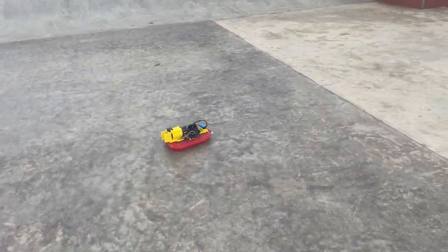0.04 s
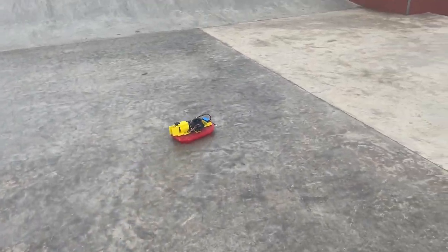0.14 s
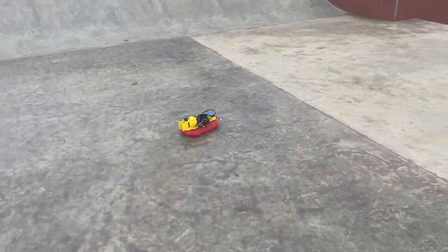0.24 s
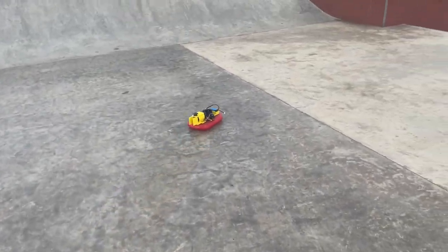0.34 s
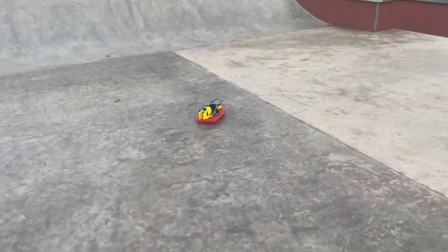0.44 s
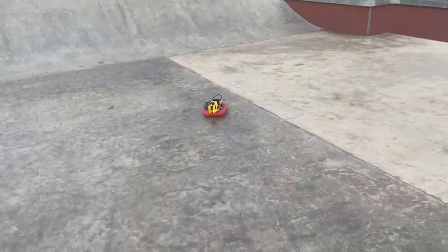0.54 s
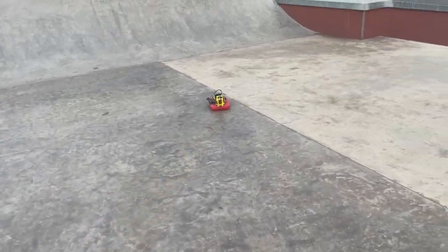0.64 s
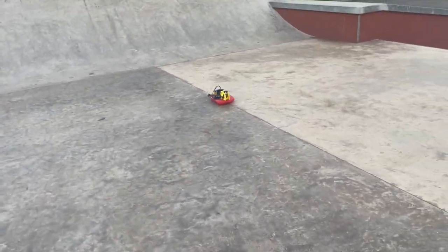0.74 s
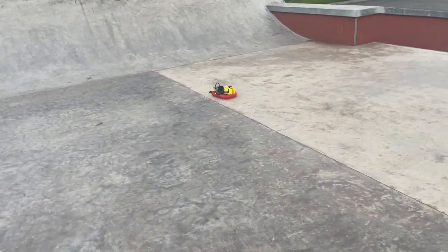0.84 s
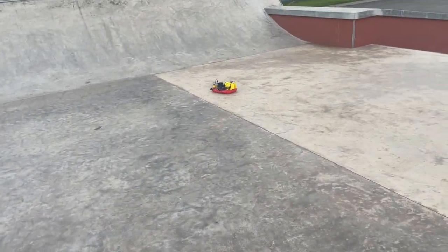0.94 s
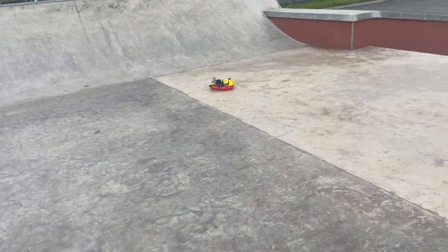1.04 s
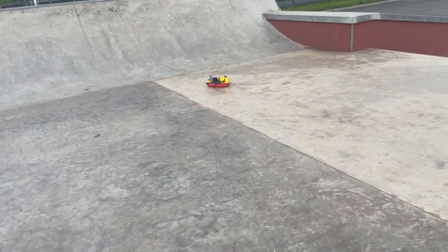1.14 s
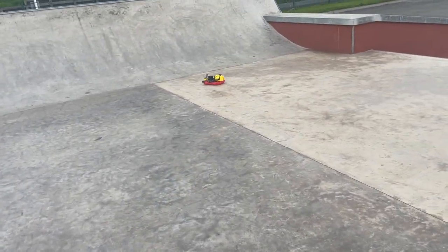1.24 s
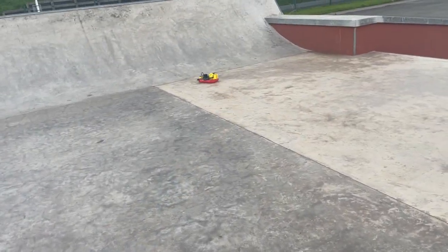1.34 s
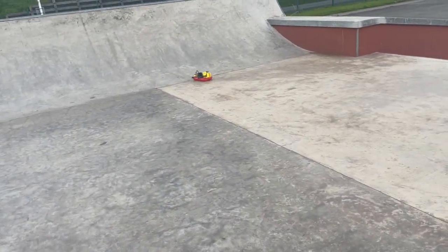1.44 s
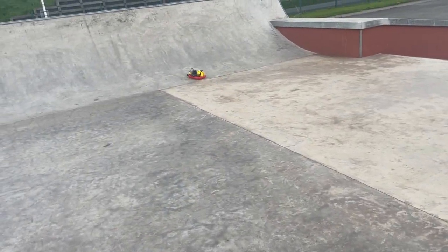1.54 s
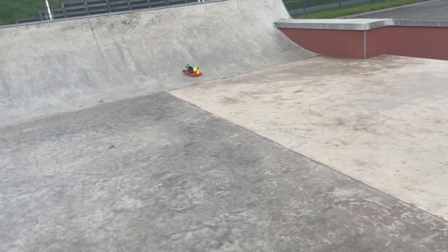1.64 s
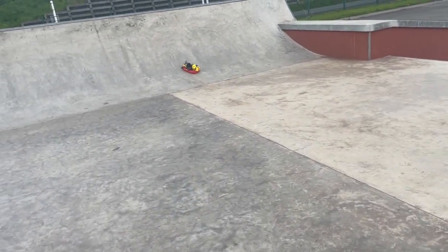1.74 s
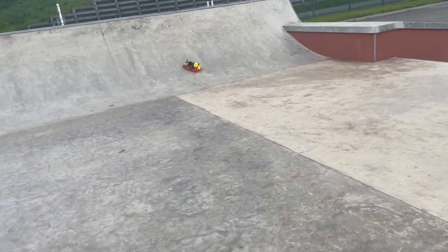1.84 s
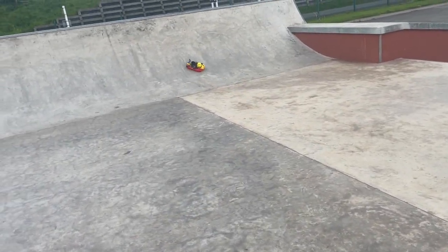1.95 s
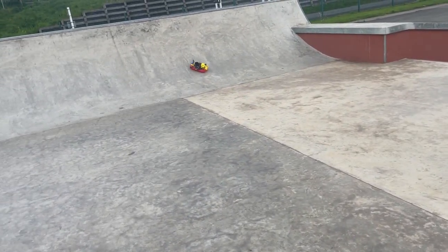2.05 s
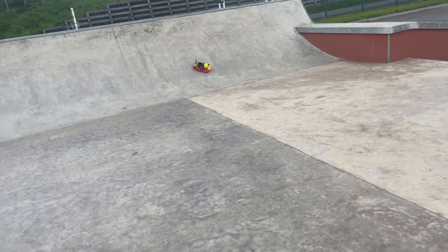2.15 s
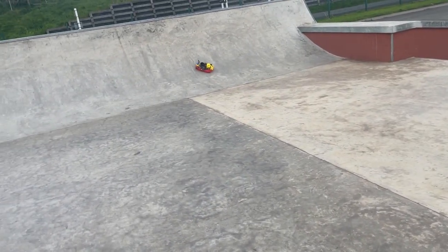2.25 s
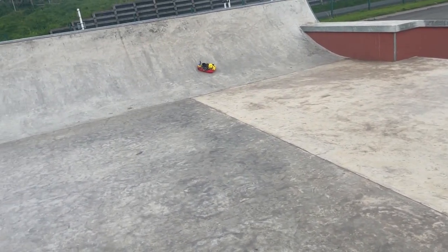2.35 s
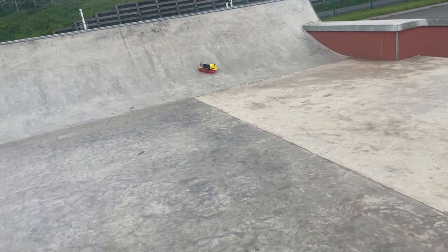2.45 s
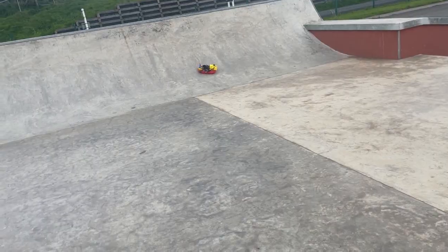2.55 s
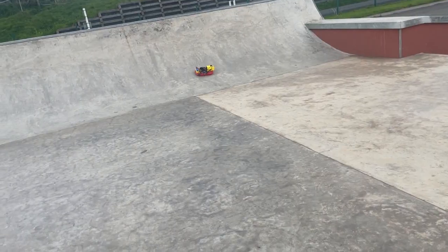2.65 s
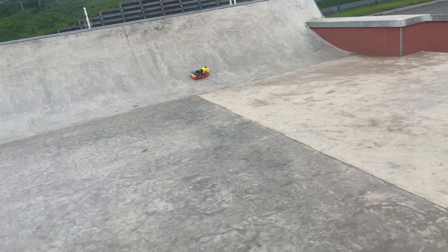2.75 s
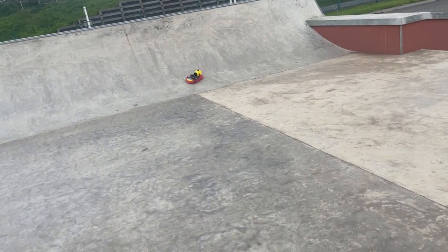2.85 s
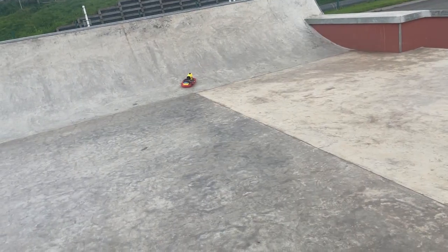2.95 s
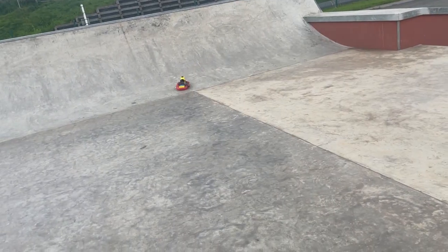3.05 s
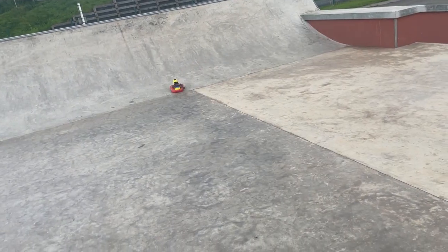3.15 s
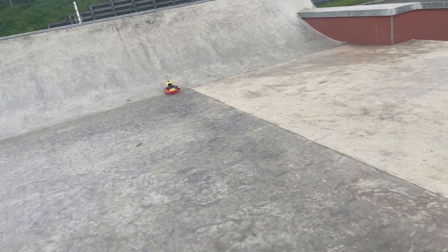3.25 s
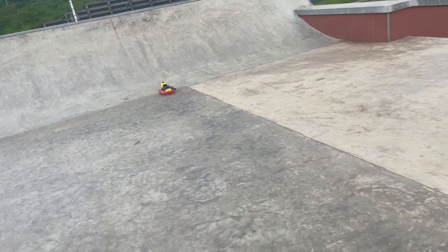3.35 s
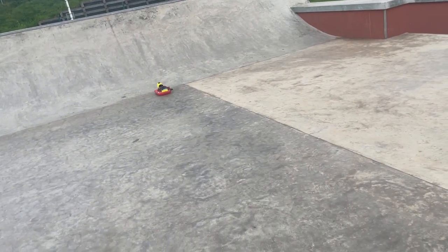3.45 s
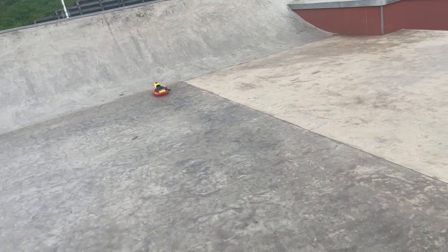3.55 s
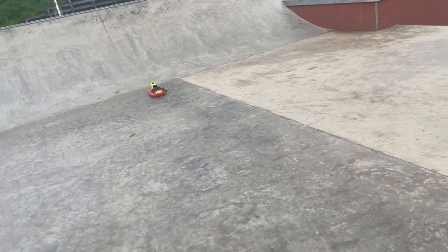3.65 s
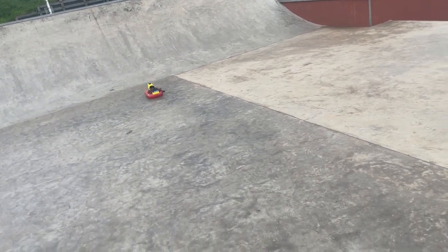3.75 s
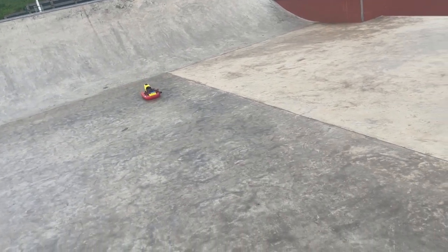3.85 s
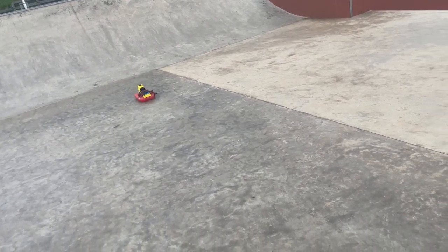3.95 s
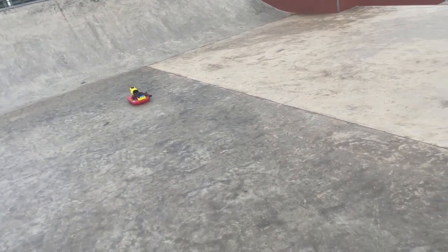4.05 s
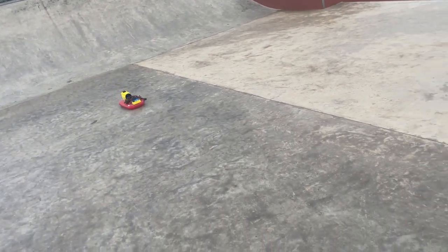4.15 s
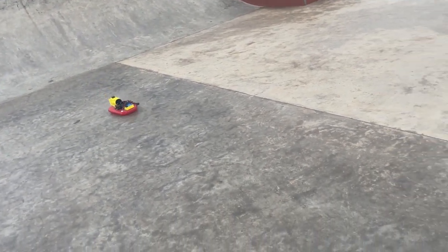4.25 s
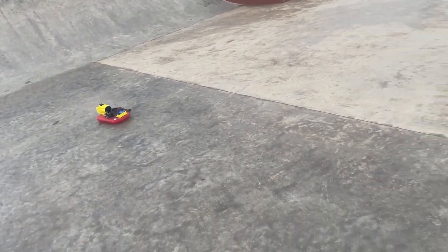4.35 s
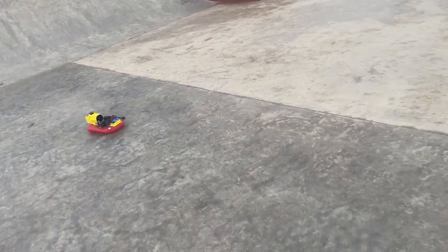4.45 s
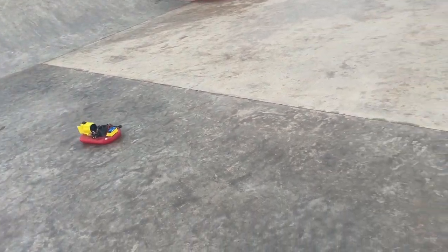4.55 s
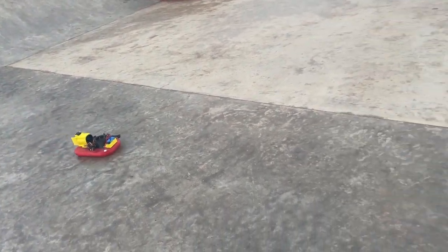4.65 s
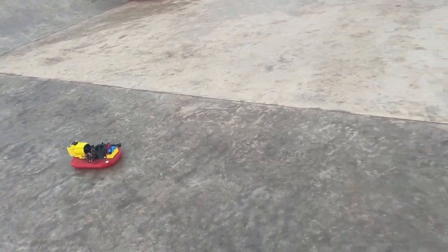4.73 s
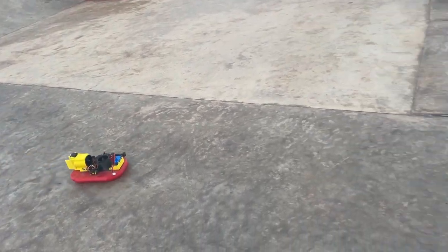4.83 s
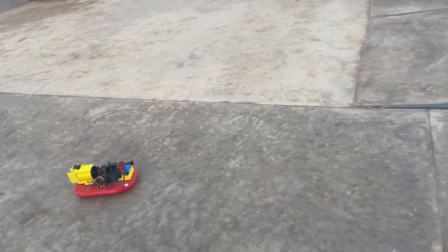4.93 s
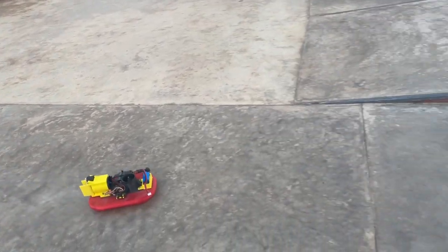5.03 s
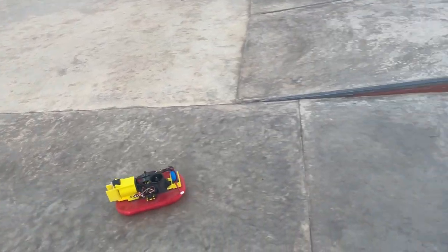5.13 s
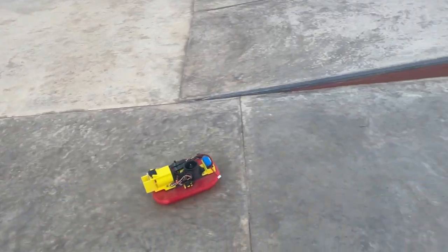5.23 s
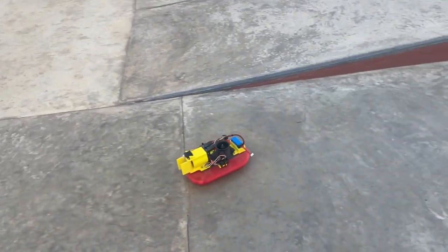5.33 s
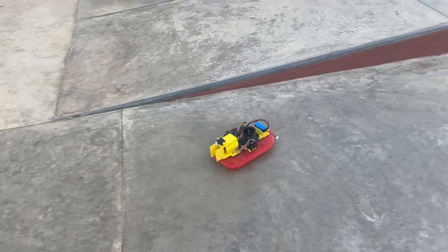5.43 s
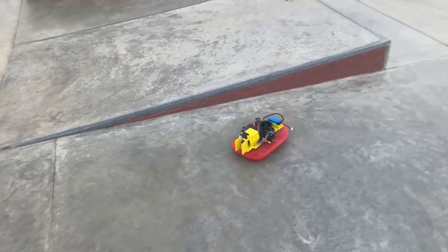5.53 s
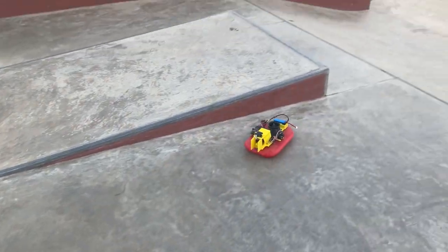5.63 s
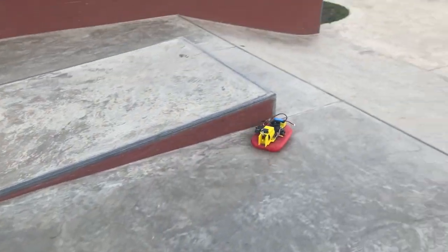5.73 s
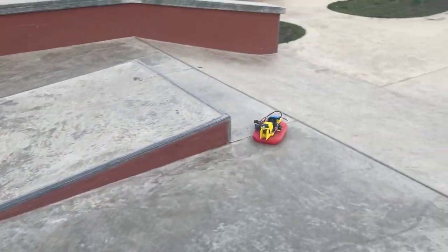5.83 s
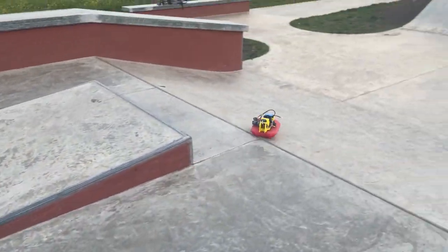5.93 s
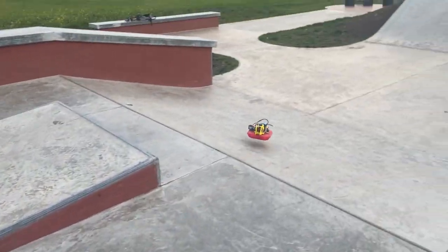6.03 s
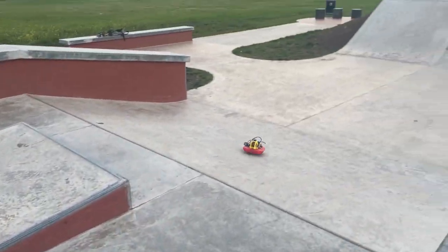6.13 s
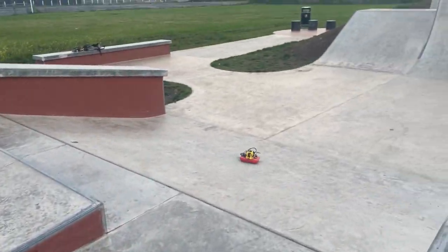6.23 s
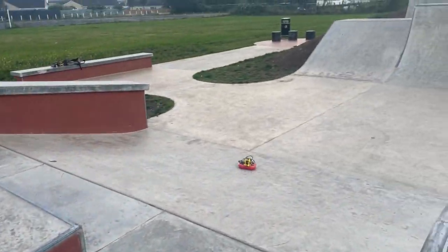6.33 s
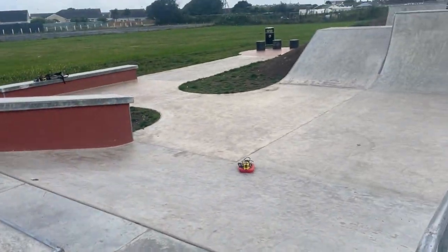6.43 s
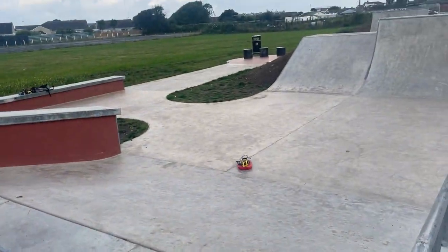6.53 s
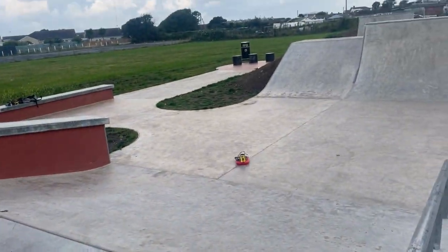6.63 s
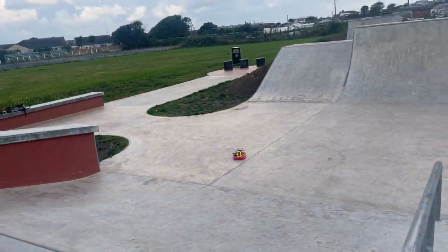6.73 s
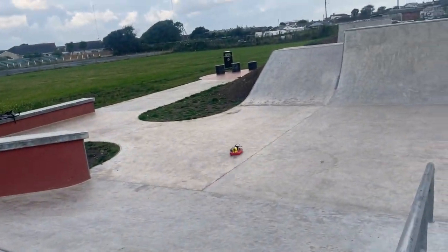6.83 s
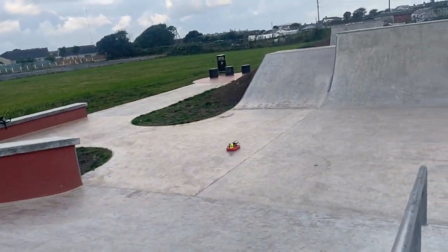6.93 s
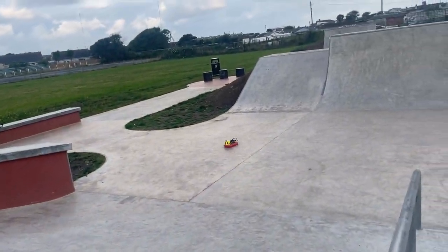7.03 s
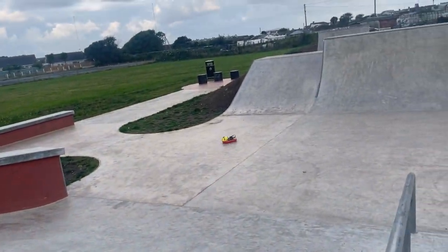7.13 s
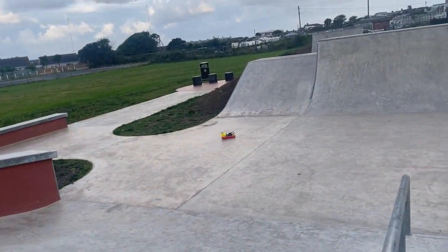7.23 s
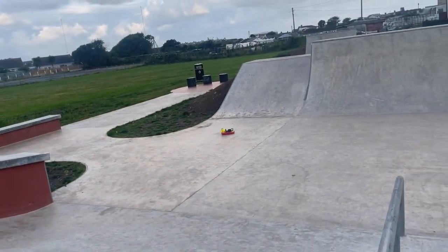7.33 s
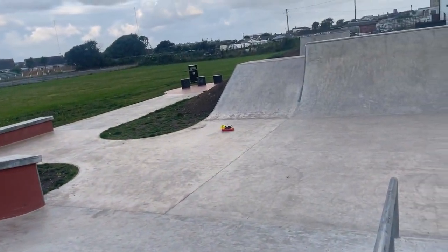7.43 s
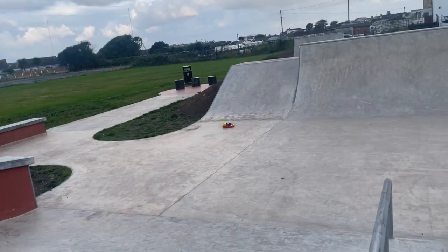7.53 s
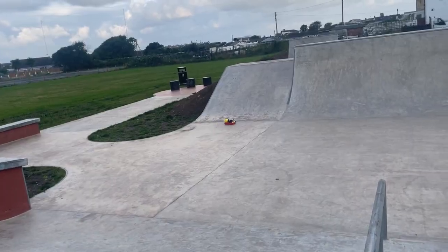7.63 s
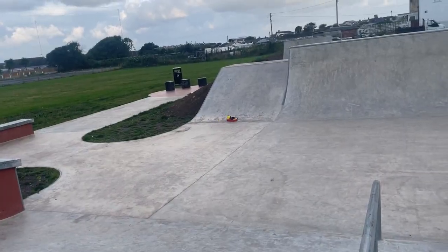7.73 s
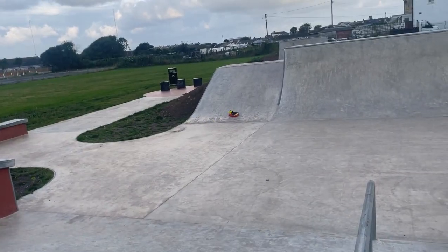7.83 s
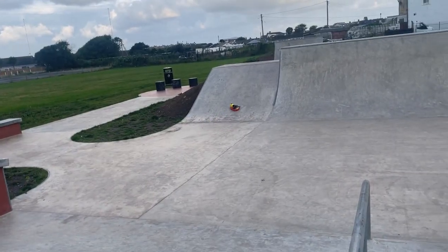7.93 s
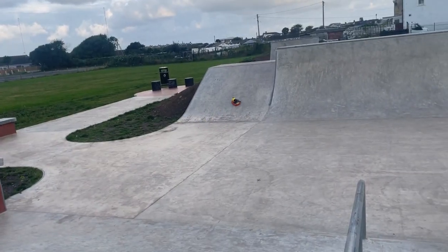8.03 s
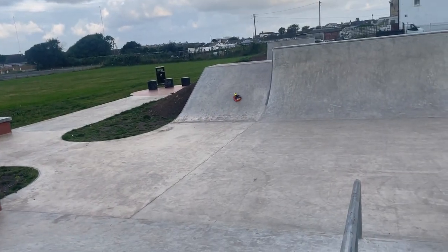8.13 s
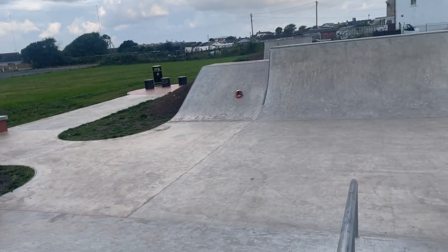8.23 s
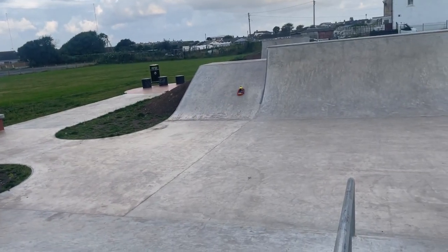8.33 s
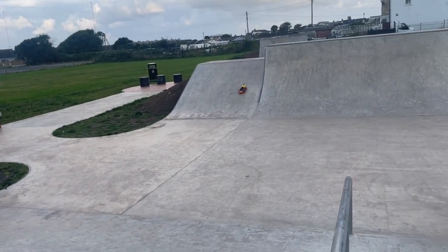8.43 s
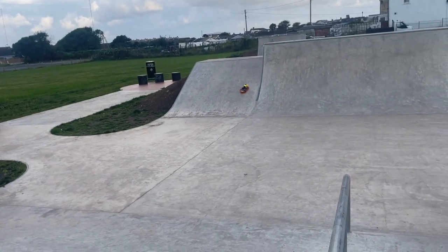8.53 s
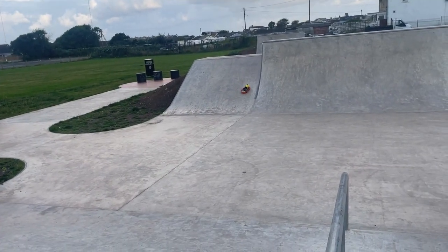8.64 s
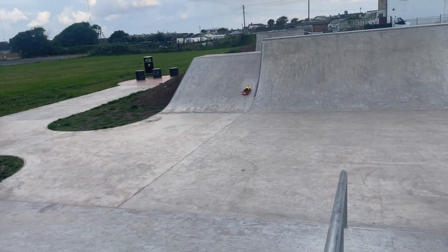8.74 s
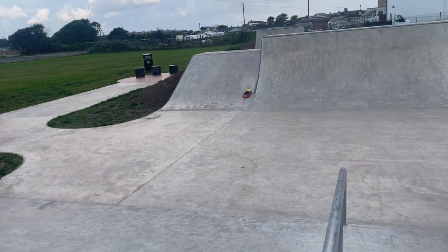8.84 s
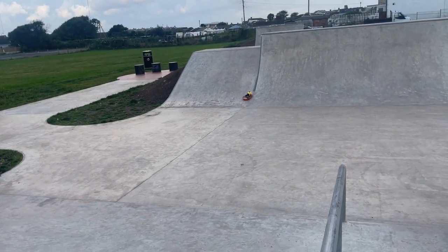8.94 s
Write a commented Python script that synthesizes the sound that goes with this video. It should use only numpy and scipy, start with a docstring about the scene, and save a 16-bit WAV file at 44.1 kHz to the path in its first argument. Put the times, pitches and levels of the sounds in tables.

```python
"""A small radio-controlled hovercraft on concrete in a skate park, heard on a hand-held two-port phone.
From the start its twelve-blade thrust fan whines with the throttle over rushing duct air and cushion roar.
Gusts soon buffet the ports: shaped noise and short sagging tones. Past 3 s the skirt scrapes lightly.
Near 6 s the cushion roar drops away, then the craft lands from a jump: decaying hull tones and scrapes.
After that, delayed copies from the ground and a far ramp comb the rush, and the tones break up."""
import sys
import numpy as np
from scipy import signal
from scipy.fft import rfft, irfft, next_fast_len
from scipy.io import wavfile
from scipy.ndimage import uniform_filter1d, map_coordinates

SR = 44100
rng = np.random.default_rng(int(sys.argv[2]) if len(sys.argv) > 2 else 0)


def unload_wav(signal):
    """Save mono or channel-first audio to the path in sys.argv[1] as 16-bit WAV at rate SR, clipped to [-1, 1]."""
    wavfile.write(
        sys.argv[1],
        SR,
        np.round(np.clip(np.atleast_2d(signal).T, -1, 1) * 32767).astype(np.int16),
    )


N = 396018
BLADES = 12
SPLIT_HZ = 6200  # where the treble begins, in the rush and at the ports
OPPOSITE = np.array([[1], [-1]])  # left and right port with opposite sign


def undb(db):
    """Decibels to gain."""
    return 10 ** (np.asarray(db) / 20)


def unit(x):
    """Scale to rms 1."""
    return x / np.sqrt(np.mean(x ** 2))


def curves(table):
    """Columns of a timed table, one value per sample."""
    s, *columns = np.transpose(table)
    return [np.interp(np.arange(N) / SR, s, column) for column in columns]


def colour(x, points):
    """Shape a signal by (frequency [Hz], level [dB]) points on a log-frequency axis."""
    size = next_fast_len(N)
    hz, db = np.transpose(points)
    grid = np.maximum(np.arange(size // 2 + 1) * SR / size, 1)
    gain = undb(np.interp(np.log(grid), np.log(hz), db))
    return irfft(rfft(x, size) * gain, size)[..., :N]


def butter(x, order, hz, kind="low"):
    """Butterworth filter running forward in time."""
    return signal.sosfilt(signal.butter(order, hz, kind, fs=SR, output="sos"), x)


def smooth_low(x, hz):
    """Low-pass without delay."""
    return signal.sosfiltfilt(signal.butter(2, hz, fs=SR, output="sos"), x)


def delayed(x, samples):
    """Read a signal late by a fixed or changing number of samples."""
    return np.interp(np.arange(N) - samples, np.arange(N), x)


def band(x, hz, width):
    """Two-pole resonance."""
    return signal.lfilter(*signal.iirpeak(hz, hz / width, fs=SR), x)


def walk(rate):
    """Random levels held 1 / rate s and smoothed twice; spread near 1."""
    hold = int(SR / rate)
    steps = np.repeat(rng.standard_normal(N // hold + 1), hold)
    return 1.477 * uniform_filter1d(uniform_filter1d(steps, hold), hold)[:N]


def gaining(log_speed, scale):
    """From 0 towards 1 as a logarithmic speed rises; scale is its rise per second."""
    return np.tanh(np.maximum(np.gradient(log_speed) * SR / scale, 0))


def fading(rate, depth):
    """Gain of a tone whose steady path meets scattered paths through turbulent air."""
    return np.hypot(1 + depth * walk(rate), depth * walk(rate))


def dip(s, half, db):
    """A flat-bottomed change of level in dB around a time."""
    return db * np.exp(-np.square(((np.arange(N) / SR - s) / half) ** 2))


def add(out, s, sound):
    """Mix a short sound in at a time."""
    i = int(s * SR)
    out[..., i:i + sound.shape[-1]] += sound[..., :N - i]


# the driver moves the throttle: (time [s], blade-passing frequency the fan heads for [Hz])
THROTTLE = [(0.0, 3981), (0.245, 3607), (0.293, 4084), (0.731, 4274), (0.896, 6842), (1.112, 6382),
            (1.267, 6512), (1.493, 5827), (1.607, 4007), (1.817, 4568), (1.972, 5232), (2.078, 6649),
            (2.302, 6169), (2.461, 8353), (2.635, 5205), (2.789, 5415), (2.902, 4354), (3.049, 4067),
            (3.235, 5300), (3.29, 5010), (3.442, 5417), (3.508, 6386), (3.65, 4465), (3.81, 5880),
            (3.958, 4806), (4.08, 5051), (4.323, 5273), (5.562, 5102), (5.746, 5167), (6.06, 4679),
            (6.273, 4721), (6.735, 4855), (6.851, 4635), (7.051, 4723), (7.272, 6424), (7.455, 5477),
            (7.627, 5768), (7.85, 4937), (8.087, 5033), (8.38, 5685), (8.615, 4923), (8.816, 5116)]


def fan_speed():
    """Blade-passing frequency: the rotor follows each throttle setting through two equal lags."""
    lag_s = .0414
    s, hz = np.transpose(THROTTLE)
    setting = hz[np.searchsorted(s, np.arange(N) / SR, side="right") - 1]
    keep = np.exp(-1 / (lag_s * SR))
    return hz[0] + signal.lfilter([(1 - keep) ** 2], [1, -2 * keep, keep ** 2], setting - hz[0])


# low motor orders: (time [s], once-a-turn level [dB], level of the rough band near seven a turn [dB])
HUM = [(1.0, -58, -68), (1.2, -43, -68), (1.8, -58, -66), (2.12, -52, -38), (2.25, -37, -39),
       (2.48, -36, -33), (2.62, -30, -39), (2.72, -36, -34), (2.84, -34, -46), (2.95, -56, -62),
       (4.2, -48, -66), (6.6, -58, -66), (7.2, -42, -66), (7.4, -58, -66)]


def motor_hum(turn):
    """Motor orders: a tone once a turn and a roughened band around a higher order."""
    hum_db, pole_db = curves(HUM)
    hum = undb(hum_db) * (fading(30, .3) + .3 * walk(120)) * np.sin(turn)
    rough = .5 * fading(40, .5) + walk(450)
    return hum + undb(pole_db) * rough * np.sin(7.4 * turn)


# a weaker rotor order: (multiple of shaft speed, level against the rush [dB], added gaining speed [dB])
SHAFT = (18, -30, 22)
# second harmonic of the blade tone: (time [s], level against the rush [dB])
OCTAVE = [(.5, -8), (.62, 1), (.75, -8), (.92, 1), (1.62, 2), (1.78, -12), (1.9, -3), (2.8, 1), (3.1, -12),
          (3.6, -2), (4.35, 1), (4.8, -5), (5.3, -4), (5.7, 3), (6.15, 4), (6.4, -4), (6.85, 1), (7.5, -11),
          (8.0, -3), (8.98, -6)]
# how these high orders reach the phone: (frequency [Hz], level [dB])
ORDER_COLOUR = [(6000, 10), (7000, 4), (8200, 7.5), (9300, -2), (11000, -5.5), (13000, -13), (15500, -13)]


def high_orders(blade_hz, turn, roughness):
    """A shaft order that rises while the fan gains speed, and the octave of the blade tone."""
    multiple, db, more_db = SHAFT
    shaft_db = db + more_db * gaining(np.log(blade_hz), 1.3)
    orders = undb(shaft_db) * fading(9.6, 0.95) * np.sin(round(multiple) * turn)
    octave_gain = undb(curves(OCTAVE)[0]) * (fading(30, 0.33) + 1.6 * roughness)
    orders += octave_gain * np.sin(2 * BLADES * turn)
    return colour(orders, ORDER_COLOUR)


# the blade tone swells and fades in a narrow beam: (time [s], level against the rush [dB])
WHINE = [(0, 0), (.45, 6), (.75, -9), (.87, 3), (1.0, -3), (1.15, 4), (1.5, -6), (1.6, 1), (1.7, -2),
         (1.87, 6), (2.02, 1), (2.1, 10), (2.18, 2), (2.35, 4), (2.47, -8), (2.61, 9), (2.85, 6), (3.05, 3),
         (3.21, -16), (3.33, 2), (3.45, -4), (3.62, 1), (4.25, 2), (4.45, -5), (4.8, -3), (5.08, 3),
         (5.3, -3), (5.5, 8), (5.7, -1), (5.8, 8), (6.0, 12), (6.14, 10), (6.27, -4), (6.5, -4), (6.62, 8),
         (6.73, 5), (6.84, 12), (7.07, -4), (7.22, 10), (7.36, -6), (7.47, 1), (7.65, 2), (7.89, -4),
         (7.97, 3), (8.19, -4), (8.34, 3), (8.6, -10), (8.79, 5), (8.98, 0)]
# later paths off the ground and off the far ramp: (time [s], first cancelled frequency [Hz], share)
BOUNCE = [
    [(6.6, 1900, 0), (6.8, 1750, .75), (7.15, 1050, .4), (7.3, 930, .4), (7.36, 900, 0)],
    [(6.8, 1050, 0), (6.95, 990, .45), (7.4, 715, .7), (7.7, 635, .8), (8.0, 575, .6), (8.3, 600, .25),
     (8.98, 680, .5)],
]
# tones come back off the far ramp: (delay [s], gain against that path's share)
RAMP_ECHO = (.031, .9)


def rotor_tones(blade_hz, air_db):
    """Blade tone, motor hum and high orders on one rotor phase; a ramp sends them back late."""
    flutter = .0014 * walk(60) + .0012 * walk(12)
    turn = 2 * np.pi * np.cumsum(blade_hz * (1 + flutter)) / SR / BLADES
    far = curves(BOUNCE[1])[1]  # by the far ramp the tones break up more
    roughness = (.33 + .8 * far) * walk(500)  # uneven inflow shakes the blade loading
    whine = (fading(30, .22 + .7 * far) + roughness) * np.sin(BLADES * turn)
    out = undb(air_db + curves(WHINE)[0]) * whine + motor_hum(turn)
    out += undb(air_db) * high_orders(blade_hz, turn, roughness)
    delay_s, gain = RAMP_ECHO
    return out + gain * far * fading(40, 0.25) * delayed(out, delay_s * SR)


def ringing(modes):
    """Noise held in a few resonances that each swell and sink; rms 1."""
    out = 0
    for hz, width, db in modes:
        held = band(band(rng.standard_normal(N), hz, width), hz, 2 * width)
        out = out + undb(db + 2.3 * walk(18)) * unit(held)
    return unit(out)


# air through duct and microphone: (frequency [Hz], relative level per Hz [dB])
RUSH = [(300, -11), (1100, 6), (1700, -0.5), (2300, -0.5), (3000, -2.5), (4400, 0.5), (5200, 0), (5900, -4),
        (6700, -5), (7400, 2), (9300, 3), (11000, -5.5), (13000, -17), (15500, -6.5)]
# three groups of duct resonances: (frequency [Hz], width [Hz], level within the group [dB])
DUCT = [
    [(2387, 600, 0)],
    [(3647, 336, 3), (3900, 1600, -3.5)],
    [(6690, 1500, 0)],
]
# cavity under the skirt, low and upper group: (frequency [Hz], width [Hz], level within the group [dB])
CUSHION = [
    [(431.5, 75, -3.5), (561, 83, -3), (657.5, 126, 2.5)],
    [(1065, 115, 0)],
]


def air(air_db, treble_db, *ring_db):
    """Turbulent duct rush in a low and a high part, the duct's howls and the roar of the cushion cavity."""
    rush = colour(rng.standard_normal(N), RUSH)
    rush /= band(rush, 1770, 1330).std()
    low = butter(rush, 2, SPLIT_HZ)
    out = low + undb(treble_db + 1.3 * walk(20)) * (rush - low)
    for db, modes in zip(ring_db, DUCT + CUSHION):
        out += undb(db) * ringing(modes)
    return undb(air_db + .8 * walk(25)) * out


# nearness: (time [s], rush at cruising speed [dB], cushion roar against it [dB])
NEAR = [(0, -37, -7.5), (.4, -40, -2), (1.3, -42.5, 0.5), (2.0, -44.5, -3.5), (2.6, -44.5, 4.5),
        (3.2, -43.5, -4.5), (3.6, -46, 10), (4.25, -43.5, 5.5), (5.2, -37.5, 4.5), (5.5, -36, 4.5),
        (5.96, -38, -4.5), (6.02, -40, -21), (6.6, -37, -10.5), (7.2, -42, -1), (8.3, -44.5, 0),
        (8.98, -43, 6)]
# heading: (time [s], 1 for nose towards the phone, -1 for fan outlet towards it)
FACING = [(1.0, 0.15), (1.6, -0.19), (2.3, 0.26), (2.6, -0.11), (2.85, 1), (3.2, -1.2), (3.9, -0.58),
          (4.5, 0.7), (5.35, 0.87), (5.75, 0.46), (7.0, -0.8), (8.25, 0.51), (8.42, 1), (8.98, 0.34)]
# the craft falls quiet for a moment: (time [s], half length [s], level change [dB])
HUSH = (3.18, .018, -6)
# treble of the rush: (time [s], level against the rush [dB])
TREBLE = [(0, -2), (1.2, -2), (2.0, 2), (2.7, -0.5), (3.9, -3.5), (5.15, -0.5), (5.7, 2.5), (6.5, -7),
          (7.4, -1.5)]
# lowest duct resonance: (time [s], level against the rush [dB])
THROAT = [(.8, -10.5), (1.5, -22), (1.95, 5), (2.15, -22), (4.3, -14), (5.1, 3), (5.95, 1), (6.02, -12),
          (7.6, -2), (8.98, -6)]
# middle duct resonance against the rush: (side-on [dB], added nose-on [dB])
HOWL = (-2.85, 10.7)
# upper duct resonance, heard ahead: (against treble [dB], most added closing in [dB], its scale [dB/s])
AHEAD = (0, 24.4, 14)
# low and upper cushion group: offset from the roar level [dB]
ROARS_DB = [5, -4.5]
# the low group carries less far: (slope [dB per dB of nearness], nearness where it is unchanged [dB])
ROAR_NEAR = (0.64, -39)


def air_levels(blade_hz):
    """Rush level from nearness and fan speed, then treble, duct and cushion levels against it."""
    cruise_hz, rush_db_per_octave, spin_up_db = 5000, 14.5, 2
    near_db, roar_db = curves(NEAR)
    octaves = np.log2(blade_hz / cruise_hz)
    thrust_db = rush_db_per_octave * octaves + spin_up_db * gaining(octaves, 1.4)
    air_db = near_db + thrust_db + dip(*HUSH)
    treble_db = curves(TREBLE)[0]
    howl_db = HOWL[0] + HOWL[1] * curves(FACING)[0]
    ahead_db, closing_db, closing_scale = AHEAD
    approach = uniform_filter1d(np.gradient(near_db), size=SR // 2) * SR  # dB per s
    closing = np.tanh(np.maximum(approach / closing_scale, 0))
    upper_duct_db = treble_db + ahead_db + closing_db * closing
    # the lift fan runs evenly, so the thrust is taken back out
    low_db, upper_db = (db + roar_db - thrust_db for db in ROARS_DB)
    low_db = low_db + ROAR_NEAR[0] * (near_db - ROAR_NEAR[1])
    return air_db, [treble_db, curves(THROAT)[0], howl_db, upper_duct_db, low_db, upper_db]


# strong single eddies bursting on the ports: (time [s], level before panning [dB], frequency [Hz])
BUFFETS = [(0.66, -27, 200), (0.748, -17, 380), (0.787, -16, 418), (0.982, -28, 200), (1.086, -13.5, 305),
           (1.52, -19, 120), (1.58, -27, 200), (1.725, -24, 200), (1.954, -20, 356), (2.038, -11, 413),
           (2.453, -19.5, 124), (3.86, -18, 120), (4.536, -15, 161), (6.64, -14.5, 280),
           (6.652, -12.5, 650), (6.662, -14.5, 190), (7.258, -20.5, 124), (7.595, -17, 175),
           (7.698, -10.5, 201), (7.783, -24, 146), (7.89, -22.5, 201), (8.218, -22.5, 90), (8.25, -24, 213),
           (8.312, -24, 175)]


def buffets():
    """Each eddy is a short low tone with a sharper front, panned at random between the ports."""
    out, t = np.zeros((2, N)), np.arange(-1300, 2200) / SR
    chances = rng.uniform(-2.6, 1, (len(BUFFETS), 2))
    for (s, db, hz), (phase, pan) in zip(BUFFETS, chances):
        swell = np.exp(-(np.abs(t) * hz / np.where(t < 0, .6, 1.6)) ** 2.0)
        # pitch sags as the eddy spreads
        eddy = swell * np.cos(2 * np.pi * hz * t / (1 + 25 * np.abs(t)) + phase)
        # smaller eddies have a sharper front
        eddy += hz / 1000 * np.exp(-(t / 0.0019) ** 2) * np.cos(2 * np.pi * 600 * t + phase)
        add(out, s + t[0] + 0.0023, undb(db + 3.1 * pan * OPPOSITE) * eddy)
    return out


# wind on the ports: (time [s], level before swells and lumps [dB])
WIND = [(.42, -43.5), (.55, -35.5), (.8, -28.5), (1.12, -30), (1.25, -34.5), (1.42, -30), (1.55, -30.5),
        (1.88, -29), (1.93, -32.5), (2.12, -35), (2.22, -31), (2.4, -33.5), (2.73, -35), (2.87, -31),
        (3.41, -34), (3.47, -42), (3.8, -38.5), (4.35, -31), (4.47, -31.5), (4.6, -25.5), (4.73, -31),
        (5.57, -26.5), (6.15, -35.5), (6.55, -30), (6.75, -36.5), (7.03, -42), (7.4, -39.5), (7.7, -28.5),
        (7.98, -32), (8.13, -33), (8.24, -30.5), (8.42, -38), (8.63, -35), (8.98, -45)]
# deep rumble in the wind: (time [s], level against the wind [dB])
RUMBLE = [(0, 1.5), (4.5, -0.5), (6.6, 1.5), (8.4, 6.5)]
# wind noise: (frequency [Hz], relative level per Hz [dB])
GUST = [(25, -25.5), (59, -0.5), (135, -3.5), (420, -14), (730, -25.5), (1200, -34), (2600, -74)]
# part that differs between the ports: (frequency [Hz], level [dB])
GUST_APART = [(30, -5), (100, -10.5), (200, -4.5), (400, -4), (900, -1)]


def wind():
    """Rumble made lumpy by eddies of scattered size, partly shared by both ports, and the strongest eddies."""
    swells_db = [dip(s, 0.016, 3.5) for s, _, _ in BUFFETS]  # the wind swells around each strong eddy
    wind_db = curves(WIND)[0] + np.max(swells_db, axis=0)
    lump = walk(40)
    port_lumps = np.array([walk(60), walk(60)])
    noise = rng.standard_normal((2, N)) * undb(1.7 * lump + 1.3 * port_lumps)
    shared, apart = colour(noise, GUST)
    both = unit(shared * undb([[.4], [-.4]]) + colour(apart, GUST_APART) * OPPOSITE)
    bass = smooth_low(both, 105)
    bright_db = 0.5 * (wind_db + 37.0) + 1.8 * walk(13)  # faster gusts carry smaller eddies
    rumble_db = curves(RUMBLE)[0] + 3.3 * walk(31)
    out = undb(wind_db) * (undb(bright_db) * (both - bass) + undb(rumble_db) * bass)
    snap = butter(both, 2, [300, 900], "band")
    out += undb(wind_db + bright_db - 2.0) * np.maximum(lump - .7, 0) * snap  # biggest lumps reach higher
    return out + buffets()


# the skirt strikes the concrete: (time [s], knock level [dB], scrape level [dB], scrape length [s])
BUMPS = [(3.134, -55, -32.5, 0.011), (3.215, -49, -34.5, 0.042), (6.229, -8.5, -27, 0.016),
         (6.2337, -17, -35, 0.012), (6.243, -23, -39, 0.013), (6.446, -25.5, -33.5, 0.058)]
# plastic hull: (frequency [Hz], level against the knock [dB], time to decay by 60 dB [s])
HULL = [(202, -6.5, 0.087), (337, -5.5, 0.055), (513, -3.5, 0.049), (1015, 10.5, 0.0082),
        (2170, 13, 0.0028), (2860, 9, 0.0026)]


def bumps():
    """Each blow rings the plastic hull while the skirt scrapes briefly."""
    out, t = np.zeros(N), np.arange(4000) / SR
    grit_colour = [(300, -33), (2000, 14.5), (6000, 10.5), (11000, 7.5), (15000, -30)]  # (Hz, dB)
    grit = unit(colour(rng.standard_normal(N), grit_colour))
    modes = sum(undb(db) * np.sin(2 * np.pi * hz * t) * 1000. ** (-t / t60) for hz, db, t60 in HULL)
    ring = np.tanh(t / 0.00036) * modes
    for s, knock_db, scrape_db, length in BUMPS:
        scrape = grit[int(s * SR):][:len(t)] * np.tanh(t / 0.002) * np.exp(-(t / length) ** 2)
        add(out, s, undb(knock_db) * ring + undb(scrape_db) * scrape)
    return out


# rough concrete scatters what lies above: ground and ramp path limits [Hz]
BOUNCE_TOP_HZ = [2190, 3200]


def bounce(x):
    """Add each delayed path; it weakens odd multiples of its first cancelled frequency."""
    for path, top_hz in zip(BOUNCE, BOUNCE_TOP_HZ):
        notch_hz, share = curves(path)
        dull = smooth_low(x, top_hz)
        late = delayed(dull, SR / notch_hz / 2)
        x = x - dull + (dull + share * late) / np.sqrt(1 + share ** 2)
    return x


# bearing of the craft: (time [s], pan below the treble before port scaling [dB], positive to the left)
BEARING = [(0.0, 8), (0.97, 2.5), (3.38, 3), (4.7, 12), (5.57, 1), (8.98, 3)]


def ports(x):
    """The phone's two ports: panned in the lows; in the treble the right one is inverted and leads."""
    lead = 6  # samples
    size = next_fast_len(N)
    hz = np.arange(size // 2 + 1) * SR / size
    spectrum = rfft(x, size)
    treble = 1 / (1 + np.exp((SPLIT_HZ - hz) / 200))
    low = irfft(spectrum * (1 - treble), size)[:N]
    led = irfft(spectrum * treble * -np.exp(2j * np.pi * hz * lead / SR), size)[:N]
    pan_db = curves(BEARING)[0]
    shaded = butter(low, 1, 700, "high")  # the phone body shades short waves most
    far = low + (undb(-.8 * pan_db) - 1) * shaded
    far = map_coordinates(far, [np.arange(N) - 0.27 * pan_db], order=3)  # the shaded port also hears it later
    return np.array([x + (undb(0.28 * pan_db) - 1) * shaded, led + far])


# scattered sound, opposite in sign at the two ports: (frequency [Hz], level [dB])
SCATTER = [(400, -7.5), (1200, -12), (2200, -15), (3300, -3.5), (4600, -38), (6000, 2.5), (7300, -49),
           (11000, -25), (13000, -6)]


def scene():
    """Craft through both ports, scattered sound from the park, and the wind."""
    blade_hz = fan_speed()
    air_db, colours = air_levels(blade_hz)
    craft = rotor_tones(blade_hz, air_db) + bounce(air(air_db, *colours)) + bumps()
    scattered = colour(bounce(air(air_db, *colours)), SCATTER)
    return ports(craft) + scattered * OPPOSITE + wind()


def record(dry):
    """The phone rounds the loudest peaks and cuts the top."""
    top_hz = 15900
    rounded = .9 * np.tanh(dry / .9)
    return signal.sosfilt(signal.ellip(14, .2, 90, top_hz, fs=SR, output="sos"), rounded)


dry = scene()
out = record(dry)
unload_wav(out)
```